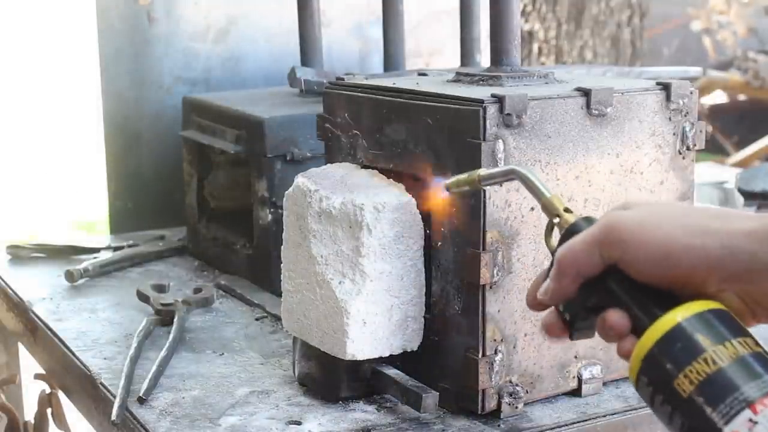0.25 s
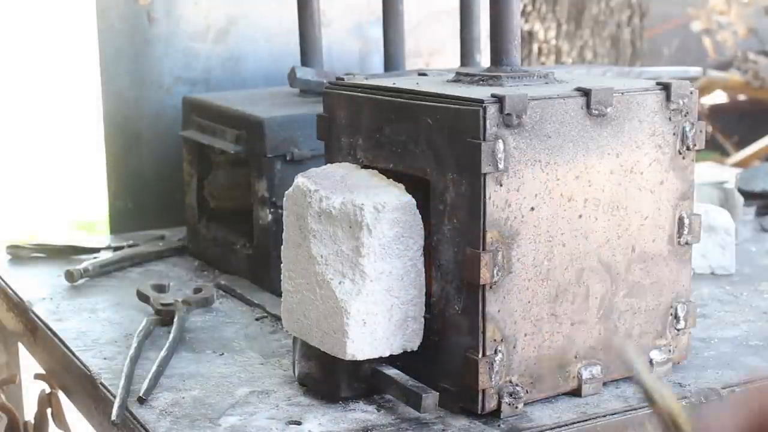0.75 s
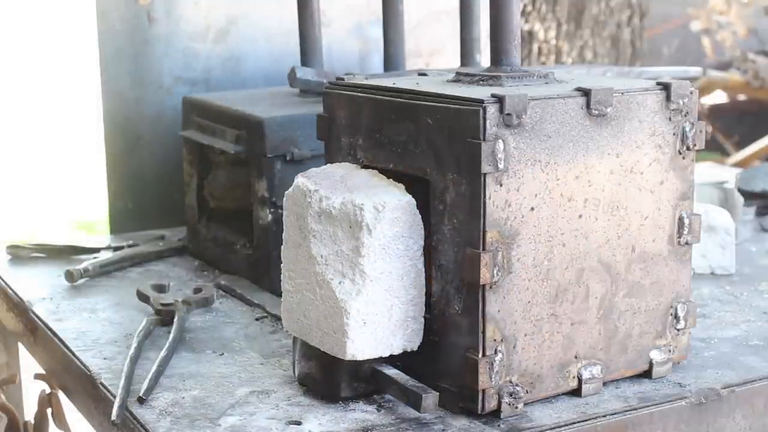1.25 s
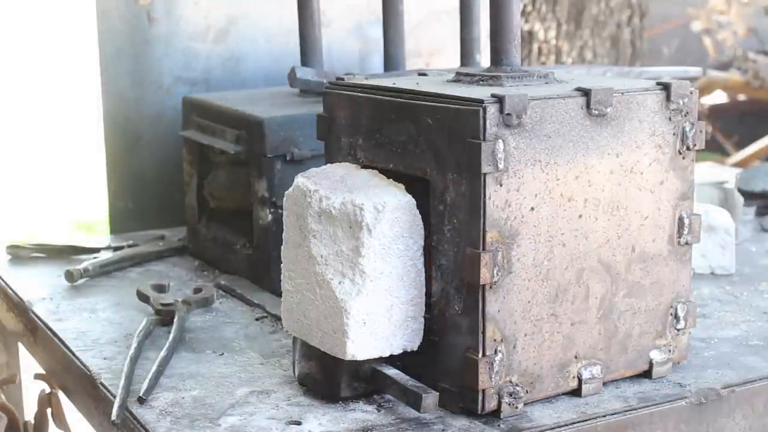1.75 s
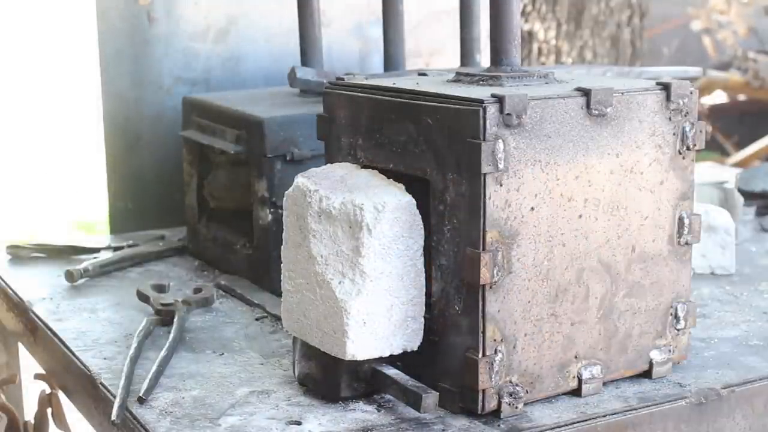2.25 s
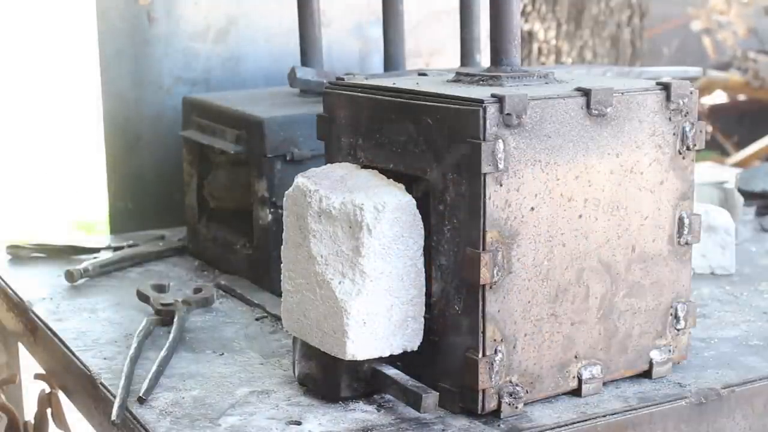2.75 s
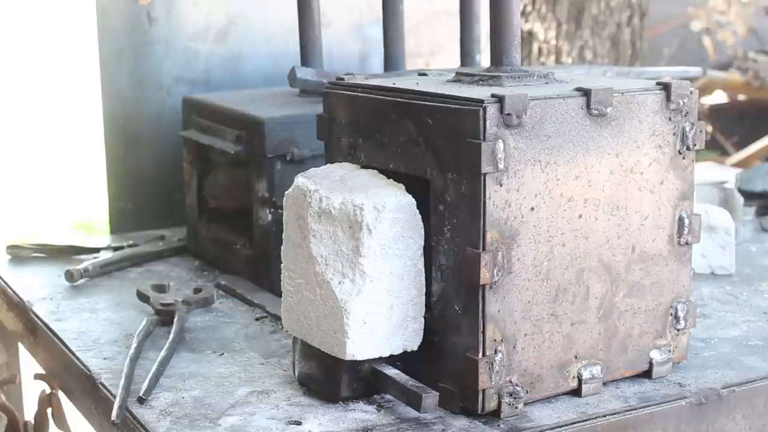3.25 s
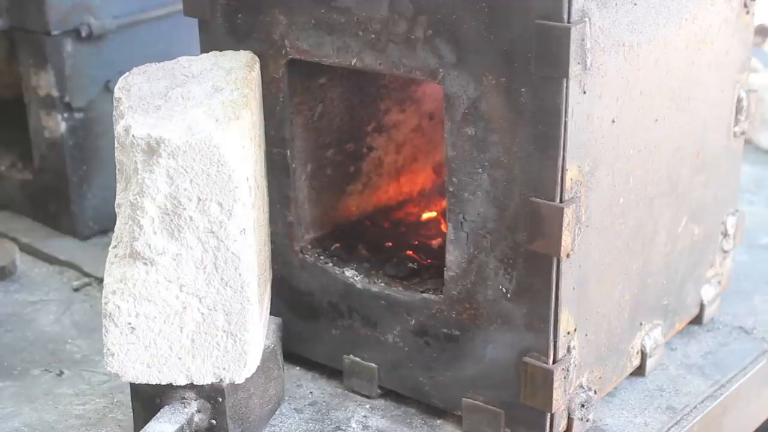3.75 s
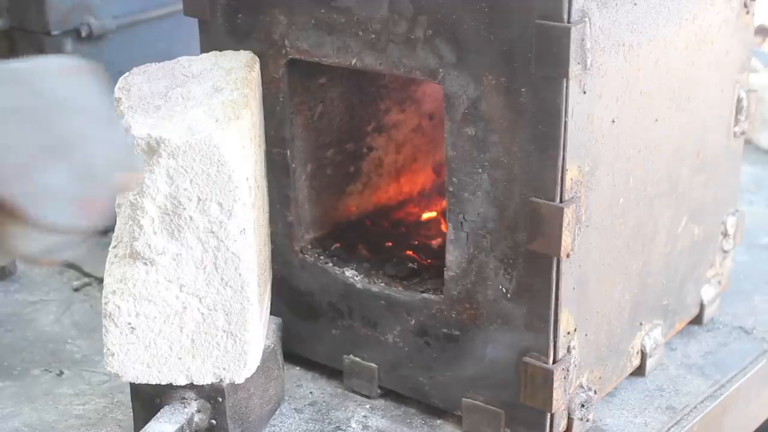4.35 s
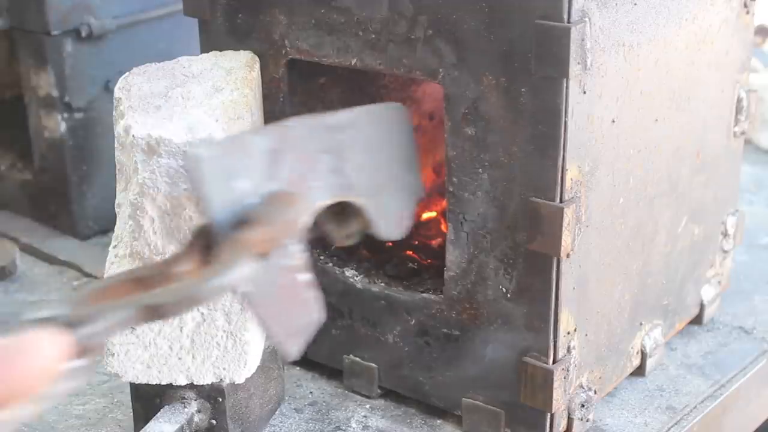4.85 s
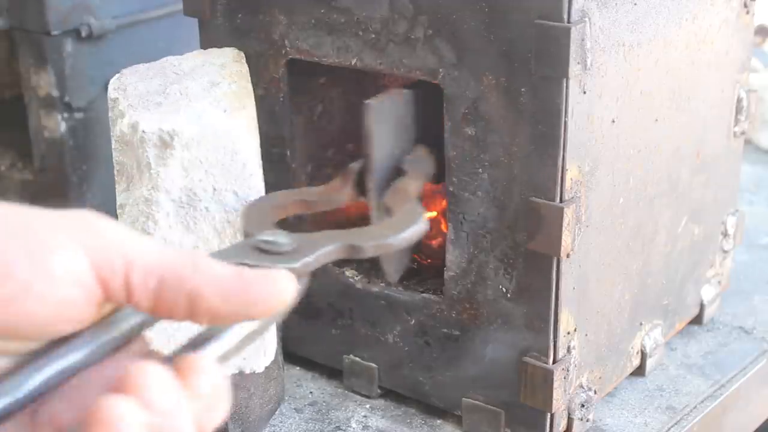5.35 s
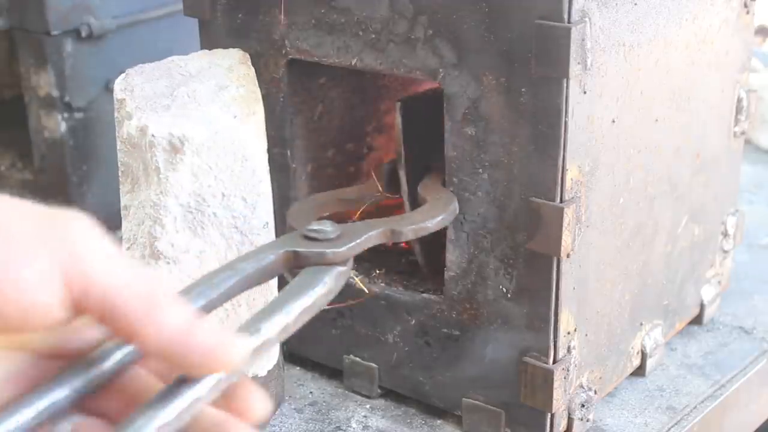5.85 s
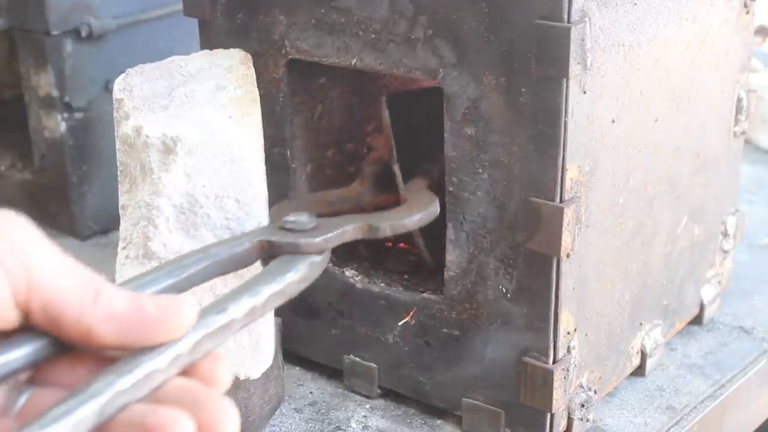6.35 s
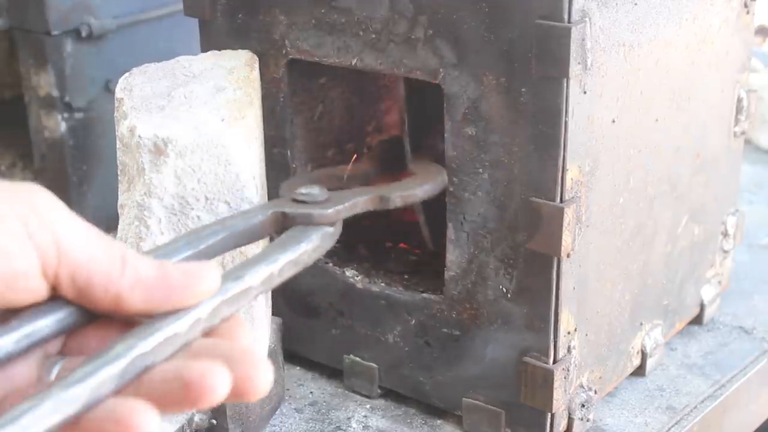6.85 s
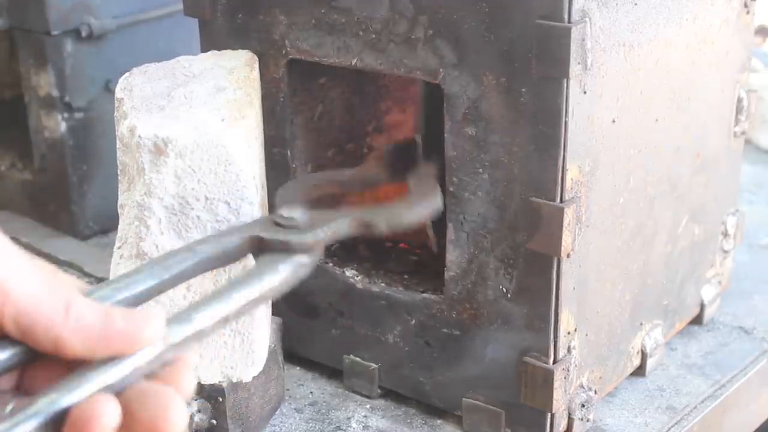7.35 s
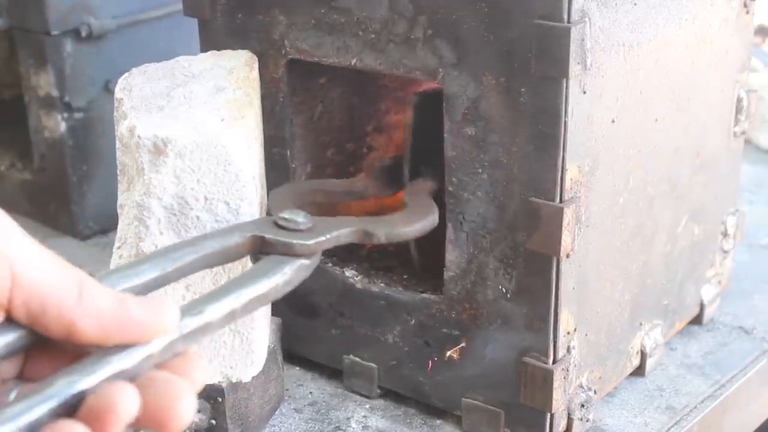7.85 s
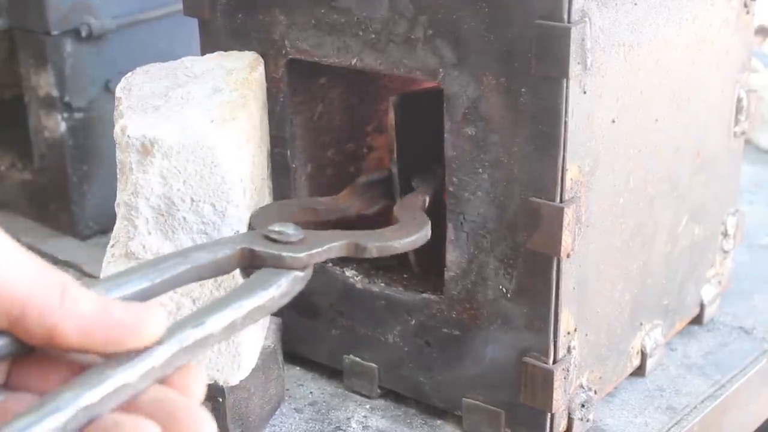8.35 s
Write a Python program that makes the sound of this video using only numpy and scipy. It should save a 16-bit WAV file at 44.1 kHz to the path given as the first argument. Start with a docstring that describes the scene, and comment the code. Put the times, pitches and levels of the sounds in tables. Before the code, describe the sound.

A hand torch hisses and pops, lighting a gas forge whose low roar fades, then returns closer as steel knocks and scrapes inside.

```python
"""A gas forge roars: random flame noise is shaped by fixed colours and by bands that glide in pitch.
A hand torch, a rough hiss with pops, lights it behind a half-closed mouth; the roar fades, then returns
at once, closer, with the mouth open. Tongs push in a steel plate, which dulls the roar. The plate knocks
(noise bursts and short rings) and scrapes (rough noise and snaps) on the lining; the tongs squeak
(rubbed modes). A short tail from close walls and a soft microphone hiss lie behind it all."""
import sys
import numpy as np
from scipy import signal
from scipy.fft import rfft, irfft, next_fast_len
from scipy.io import wavfile
from scipy.ndimage import uniform_filter1d

SR = 44100
rng = np.random.default_rng(int(sys.argv[2]) if len(sys.argv) > 2 else 0)


def store_wav(level_fs):
    """Save 16-bit WAV to argv[1]."""
    pcm = np.round(np.clip(np.atleast_2d(level_fs), -1, 1) * 32767)
    wavfile.write(sys.argv[1], SR, pcm.T.astype(np.int16))


N = 380141
T = np.arange(N) / SR  # time of each sample, s


def undb(db):
    """Turn decibels into a plain gain."""
    return 10 ** (np.asarray(db) / 20)


def unit(x):
    """Scale a signal to an average (RMS) strength of 1."""
    return x / np.sqrt(np.mean(x ** 2))


def colour(x, points, peaks=()):
    """Filter by a curve of (f/Hz, level/dB) and peaks of (f/Hz, width/Hz, level/dB); keeps white noise's power."""
    size = 8192
    hz = np.fft.rfftfreq(size, 1 / SR) + 1
    curve_hz, curve_db = np.array(points).T
    db = np.interp(np.log(hz), np.log(curve_hz), curve_db)
    for peak_hz, width_hz, peak_db in peaks:
        db = db + peak_db / (1 + (2 * (hz - peak_hz) / width_hz) ** 2)
    # fold the cepstrum forward so that the filter answers at once and never ahead of its input
    cepstrum = irfft(np.log(undb(db)))
    cepstrum[1:size // 2] *= 2
    cepstrum[size // 2 + 1:] = 0
    response = irfft(np.exp(rfft(cepstrum)))
    return signal.fftconvolve(x, response / np.linalg.norm(response))[:N]


def walk(rate):
    """Random levels, each held 1 / rate seconds, then smoothed twice; spread 1."""
    hold = int(SR / rate)
    levels = rng.standard_normal(N // 16 + 1)[:N // hold + 1]
    smooth = uniform_filter1d(np.repeat(levels, hold), hold)
    return unit(uniform_filter1d(smooth, hold)[:N])


def ring(x, hz, t60):
    """One mode struck by x: a tone that falls 60 dB in t60 seconds."""
    r = np.exp(-np.log(1000) / (t60 * SR))
    w = 2 * np.pi * hz / SR
    return signal.lfilter([0, np.sin(w)], [1, -2 * r * np.cos(w), r * r], x)


def bursts(times, dbs, t60s, rise_s=0.001):
    """Loudness curve of quick starts that die away."""
    out = np.zeros(N)
    for s, db, t60 in zip(times, dbs, t60s):
        i = int(s * SR)
        age = T[:min(SR // 4, N - i)]
        out[i:i + len(age)] += (1 - np.exp(-age / rise_s)) * undb(db - 60 * age / max(t60, .002))
    return out


# Colour of the roar for each state of the mouth: f/Hz, relative level/dB
BRICKED_COLOUR = [(15, -64), (25, -33), (82, -19), (140, -6.5), (315, -7), (360, -6.5), (498, -2.5),
                  (901, -27), (1590, -29), (1820, -36), (2580, -35), (3560, -39), (5480, -42.5),
                  (6440, -50), (15700, -55.5)]
OPEN_COLOUR = [(15, -68), (25, -40), (140, -3.5), (307, -4), (370, -1.5), (525, 0), (652, -5.5),
               (1240, -23), (1540, -19), (2510, -26.5), (3370, -25), (3860, -37), (4420, -38),
               (6800, -47.5), (15700, -52)]
ACROSS_COLOUR = [(15, -80), (25, -43), (64, -26), (129, -5.5), (298, -2.5), (391, -3), (447, -2),
                 (618, -8.5), (707, -25), (787, -14), (1420, -27.5), (1540, -31.5), (2510, -29.5),
                 (4070, -36.5), (15700, -56)]
PLATE_INSIDE_COLOUR = [(15, -72), (25, -49), (113, -7), (205, -4.5), (307, -1.5), (435, 2), (707, -16),
                       (787, -9.5), (1460, -28.5), (2020, -24.5), (3200, -33.5), (3660, -33.5),
                       (5190, -38.5), (5940, -45), (15700, -54.5)]
# Resonances and nulls of chamber and burner tubes:
# f/Hz, width/Hz, then level/dB bricked, level/dB open, level/dB plate across, level/dB plate inside
CHAMBER_MODES = [(301, 51, 8, 6, 3, 4), (381.5, 37, -1, -5.5, -2, -7), (461, 130, -1.5, 1, 4.5, 0),
                 (630, 160, -1, 4, 1.5, 2.5), (750, 83, 1, -3.5, 6, 1), (1327, 25, 9.5, 8, -13, 7),
                 (1536, 280, 5, -9.5, 3.5, 0.5), (1993, 140, 1, 4, 7, 7.5), (2146, 65, 8, 8, 7.5, 6.5),
                 (2417, 120, 3, 8, 10.5, 7.5), (2600, 144, 7, 7, 7.5, 1.5), (3187, 340, 4.5, 0, 3, 10.5),
                 (4380, 120, -1, 6.5, 3, 4.5), (5450, 690, 6.5, 9, 6.5, 6.5), (7100, 730, 4, 4.5, 0.5, 4.5),
                 (9100, 420, 6, 6, 1, 3.5)]
# Where the plate is: t/s, place (0 away, 1 across the mouth, 2 or more inside)
PLATE_PLACE = [(4.88, 0.05), (5.08, 0.97), (5.5, 0.89), (5.66, 0.98), (6.3, 2.5)]
# Two resonances of the open mouth shift and swell as the plate nears;
# once it is covered the low one dies, while the high one dips, then returns:
# t/s, low f/Hz, low level/dB, high f/Hz, high level/dB
MOUTH_BANDS = [(3.68, 634, -35.5, 2490, -54), (4.3, 638, -38, 2430, -58.5), (4.65, 696, -34.5, 2420, -45),
               (4.87, 785, -30, 2500, -38), (4.95, 796, -46, 2500, -62), (5.2, 800, -60, 2440, -44),
               (5.5, 800, -76, 2620, -51)]
# Two resonances behind the brick drift and swell while the flame settles:
# t/s, low f/Hz, low level/dB, high f/Hz, high level/dB
SETTLING_BANDS = [(.35, 312, -34, 471, -24.5), (1.1, 300, -34, 418, -36.5), (1.6, 221, -27.5, 510, -32),
                  (2.0, 202, -39.5, 440, -35.5), (2.5, 197, -45, 559, -32), (3.3, 189, -45, 523, -30)]
# Gas in the chamber mouth whooshes up before it catches: t/s, f/Hz, level/dB
WHOOSH_BAND = [(.17, 1500, -42), (.27, 1500, -41), (.3, 1450, -24), (.34, 1000, -35), (.4, 1100, -68)]
MOUTH_WIDTH_HZ, SETTLING_WIDTH_HZ, WHOOSH_WIDTH_HZ = (100, 400), (60, 70), (1160,)
CATCH_S, CATCH_RISE_S = 0.286, 0.034  # the forge lights
BRICKED_DB, OPEN_DB = -25, -24  # level of the coloured roar, without the gliding bands


def forge():
    """Flame noise heard through the chamber, whose resonances change as brick or plate covers the mouth."""
    drive = turbulence()
    modes = np.array(CHAMBER_MODES)
    colours = BRICKED_COLOUR, OPEN_COLOUR, ACROSS_COLOUR, PLATE_INSIDE_COLOUR
    bricked, *states = (colour(drive, c, modes[:, [0, 1, 2 + k]]) for k, c in enumerate(colours))

    # far view: the flame catches behind the brick
    lit = np.clip((T - CATCH_S) / CATCH_RISE_S, 0, 1) ** 2
    air = np.roll(drive, SR)  # the same noise a second apart, so these bands vary on their own
    settling = glide(air, SETTLING_BANDS, SETTLING_WIDTH_HZ)
    whoosh = glide(air, WHOOSH_BAND, WHOOSH_WIDTH_HZ)
    far = lit * (undb(BRICKED_DB) * bricked + settling) + whoosh

    # close view: the plate's place cross-fades the three colours
    place = np.clip(np.interp(T, *np.transpose(PLATE_PLACE)), 0, 2)
    roar = sum(np.clip(1 - np.abs(place - k), 0, 1) * state for k, state in enumerate(states))
    near = undb(OPEN_DB) * roar + glide(drive, MOUTH_BANDS, MOUTH_WIDTH_HZ)
    return far, near


def turbulence(puff_db=2.1, puff_rate=300, swell_db=.4, flicker_db=.9, wander_db=.8, sputter_db=1.2):
    """Uneven burning: quick puffs in all bands, sputter in the gas jets, each half octave flickering alone."""
    puffs = walk(puff_rate)
    # a puff uses up gas, so a lull follows it and the mean over 50 ms stays even
    puffs = puff_db * unit(puffs - uniform_filter1d(puffs, SR // 20))
    puffs = puffs + swell_db * walk(2.594)
    sputter = walk(22)
    sputter = sputter_db * unit(sputter - uniform_filter1d(sputter, SR // 3))

    size = next_fast_len(N)
    spectrum = rfft(rng.standard_normal(N), size)
    half_octave = 2 * np.log2(np.fft.rfftfreq(size, 1 / SR) / 40 + 1e-9)  # counted up from 40 Hz
    half_octave = np.clip(half_octave, 0, 18)
    out = 0
    for k in range(19):
        share = np.cos(np.pi / 2 * np.clip(half_octave - k, -1, 1)) ** 2  # overlapping bands
        jet = np.clip((k - 7) / 6, 0, 1)  # higher bands belong more to the gas jets
        flicker = flicker_db * walk(12)
        wander = (1 - 0.59 * jet) * wander_db * walk(2.403)
        level_db = (1 - 0.58 * jet) * puffs + jet * sputter + flicker + wander
        out = out + irfft(spectrum * share)[:N] * undb(level_db)
    return unit(out)


def glide(drive, table, widths_hz):
    """Resonances as narrow bands of flame noise, whose pitches and levels glide along a table."""
    s, *columns = np.transpose(table)
    span = slice(int(s[0] * SR) - SR // 10, int(s[-1] * SR) + SR // 2)
    t, out = T[span], np.zeros(N)
    for hz, db, width_hz in zip(columns[::2], columns[1::2], widths_hz):
        # shift the band down to 0 Hz, keep what is near it, shift it back up
        turn = np.exp(2j * np.pi * np.cumsum(np.interp(t, s, hz)) / SR)
        lowpass = signal.butter(2, width_hz / 2, fs=SR, output="sos")
        band = signal.sosfilt(lowpass, drive[span] / turn) * turn
        out[span] += unit(band.real) * undb(np.interp(t, s, db)) * (t > s[0])
    return out


# Torch jet sputters out, relights with a burst, holds nearly steady while the forge catches, then is shut:
# t/s, level/dB
TORCH_JET = [(0, -27.5), (.11, -42), (.124, -39), (.13, -25.5), (.18, -29.5), (.275, -28.5), (.3, -29),
             (.34, -29), (.36, -33), (.4, -36.5), (.5, -65)]
# Colour of the torch jet: f/Hz, relative level/dB
TORCH_COLOUR = [(35, -69), (60, -31), (361, -13.5), (396, -12.5), (455, -13.5), (561, -11.5), (602, -22),
                (708, -15), (1240, -11.5), (15700, -46.5)]
# Ignition pops: t/s, level/dB (of the start, before its rise), time to fall 60 dB/s
IGNITION_POPS = [(0.133, -27.5, 0.078), (0.1443, -9, 0.029)]
# Colour of the pops: f/Hz, relative level/dB
POP_COLOUR = [(59, -19), (100, -12), (468, 5), (2600, -25), (3080, -29), (3800, -4), (4600, -22),
              (5930, -13.5), (15700, -36.5)]
VALVE_S, VALVE_DB = .3605, -36  # torch trigger clicks shut


def torch():
    """Gas rushing from a nozzle as rough noise, pops of gas catching, and the click of the trigger."""
    rough_noise = unit(rng.standard_normal(N) * undb(1.0 * walk(213.0)))
    gas = undb(np.interp(T, *np.transpose(TORCH_JET), right=-200))  # silent after the last row
    jet = colour(rough_noise, TORCH_COLOUR) * gas
    pops = colour(rng.standard_normal(N) * bursts(*np.transpose(IGNITION_POPS)), POP_COLOUR)
    bright_noise = np.diff(rng.standard_normal(N + 1))
    click = bright_noise * bursts([VALVE_S], [VALVE_DB], [.012])
    return jet + pops + click


# Plate knocking on the lining: t/s, relative level/dB, brightness as level/dB, spot (0 face to 1 edge)
PLATE_KNOCKS = [(4.5676, -24.5, -8, .2), (5.6075, -27, -1, .05), (5.7184, -26, -9, .05),
                (5.7394, -30, -6, .05), (5.753, -29, -9, .3), (5.798, -19, 4.5, .3), (5.813, -32, 3, .1),
                (6.1994, -28, 5, .4), (6.2494, -32, 9, .4), (6.4014, -27.5, -1, .4), (6.4178, -29, -6, .7),
                (6.4564, -26.5, 5, .4), (6.505, -37, 8, .4), (6.7231, -30, 7, .4), (6.821, -25, -2, .4),
                (6.8314, -34, 10, .4), (6.984, -30, 3, .7), (7.109, -36, 0, .4), (7.1294, -30, 2, 0.62),
                (7.496, -16, 2, .1), (7.512, -36, 3, .2), (7.638, -25, 3, .3), (7.647, -31, 1, .6),
                (7.671, -23, 0, .3), (7.681, -24.5, 7, .2), (7.7543, -26, 7, .7), (7.848, -25, -1, .5),
                (7.872, -28, 4, .3), (7.9624, -24, -2, .5), (7.991, -20.5, 2, .9)]
# Colour of knocks and scrapes: f/Hz, relative level/dB
KNOCK_COLOUR = [(300, -18), (900, 5.5), (1400, 3.5), (2200, 0), (3300, 0), (5200, -7), (6500, -12),
                (10000, -20), (15800, -22)]
# Modes of the plate: f/Hz, level/dB hit on the face, level/dB hit on the edge, time to fall 60 dB/s
PLATE_MODES = [(1500, 12, -13, 0.023), (2130, 1, 0, 0.036), (3420, 1, -2, 0.03), (4200, -9, -3, 0.04),
               (5190, -10, 1, 0.045), (7300, -11, -1, .03)]
# Plate dragged over the rough lining: start t/s, length/s, relative level/dB
PLATE_DRAGS = [(4.523, 0.081, -48), (5.565, 0.055, -47), (5.695, 0.071, -40.5), (6.115, 0.13, -46),
               (6.3, 0.17, -48), (6.602, 0.21, -44.5), (6.967, 0.14, -50), (7.2, 0.28, -55),
               (7.62, 0.089, -48), (7.78, 0.18, -46.5)]
KNOCK_T60_S, KNOCK_CRUNCH_S = 0.045, 0.0069  # decay of a blow; time the lining crunches under it
DRAG_SWELL, DRAG_STOP_S = 0.5, 0.03  # power of the build-up; time to die away
# crumbs snapping under the drag: how many, level relative to the drag, its scatter, decay
GRIT_PER_S, GRIT_DB, GRIT_SCATTER_DB, GRIT_T60_S = 200, 6, 3.5, 0.008


def plate(crack_db=-1, ring_db=-40, vary_db=4.0, rise_s=0.0022, treble_db=-3, chime_db=-20,
          chime_t60=0.016, grit_db=4, scrape_hz=3500, tick_db=14):
    """Blows make gritty cracks that ring the steel, each with its own brightness; drags rasp and snap crumbs."""
    s, db, bright_db, on_edge = np.transpose(PLATE_KNOCKS)
    on_edge = np.clip(on_edge, 0, 1)
    dull_noise, sharp_noise, drag_noise = rng.standard_normal((3, N))

    drag = np.zeros(N)
    for start, length, drag_db in PLATE_DRAGS:
        swell = np.clip((T - start) / length, 0, 1) ** DRAG_SWELL
        stop = np.exp(-np.clip(T - start - length, 0, None) / DRAG_STOP_S)
        drag += undb(drag_db) * swell * stop

    # crumbs snap at random moments, as strongly as the drag allows
    snap_now = rng.random(N) < GRIT_PER_S / SR
    snaps = snap_now * undb(GRIT_DB + GRIT_SCATTER_DB * rng.standard_normal(N)) * drag
    crumb_decay = undb(-60 / (GRIT_T60_S * SR))
    crumbs = signal.lfilter([1], [1, -crumb_decay], uniform_filter1d(snaps, SR // 500))

    def crunch(level_db):
        """Loudness of the blows, smeared over the crunch time."""
        blows = bursts(s, level_db, np.full(len(s), KNOCK_T60_S), rise_s)
        return uniform_filter1d(blows, int(KNOCK_CRUNCH_S * SR))

    # below 6 kHz follows the level; above it also follows the brightness
    below = signal.butter(2, 6000, fs=SR, output="sos")
    above = signal.butter(2, 6000, "high", fs=SR, output="sos")
    dull = signal.sosfilt(below, crunch(db) * dull_noise)
    sharp = signal.sosfilt(above, crunch(db + bright_db + treble_db) * sharp_noise)
    contact = dull + sharp

    latest = np.clip(np.searchsorted(s, T) - 1, 0, None)  # the most recent knock at each moment
    spot_db = vary_db * rng.standard_normal((len(PLATE_MODES), len(s)))  # each blow lands on its own spot
    rings = 0
    for (hz, face_db, edge_db, t60), spot in zip(PLATE_MODES, spot_db):
        mode_db = face_db + on_edge * (edge_db - face_db) + spot
        rings = rings + ring(contact * undb(mode_db)[latest], hz, t60)

    rasp = (drag + crumbs) * unit(drag_noise * undb(grit_db * walk(120)))
    rasp = signal.lfilter(*signal.butter(1, scrape_hz, fs=SR), rasp)  # dull rasp
    scrape = rasp + undb(tick_db) * snaps  # thin ticks
    # crumbs ping the tongs
    chimes = sum(ring(snaps * rng.standard_normal(N), hz, chime_t60) for hz, *_ in TONGS_MODES)
    knocks = colour(undb(crack_db) * contact + scrape, KNOCK_COLOUR)
    return undb(chime_db) * chimes + knocks + undb(ring_db) * rings


# Tongs squeaking: t/s, length/s, relative level/dB, spot (0 jaw to 1 pivot)
TONGS_SQUEAKS = [(6.43, 0.025, -56, 0.085), (6.455, 0.026, -48, 0), (6.66, 0.06, -50, 0.28),
                 (6.715, 0.017, -48, 0.25), (7.02, 0.08, -62, 0.84), (7.11, .025, -62, 1),
                 (7.905, 0.03, -60, 0.76)]
# Modes of the tongs: f/Hz, level/dB rubbed at the jaw, level/dB rubbed at the pivot
TONGS_MODES = [(4790, 5.5, -30), (6470, -20, 8), (7100, -6, -12), (7500, -20, 6), (8100, -16, -15),
               (9950, -10, 0), (11580, 3, -13), (12300, -25, -7), (13400, -17, -18), (14500, -18, -14),
               (14800, -20, -6)]


def tongs(mode_t60=0.025, rough=1.3, flutter_db=5.0, flutter_s=0.015):
    """Rubbing steel drives its modes with a rough swell; jaw and pivot favour different ones."""
    out, age = np.zeros(N), T[:SR // 5]
    for s, length, db, pivot in TONGS_SQUEAKS:
        start = int(s * SR)
        swell = np.sin(np.pi * np.clip(age / length, 0, 1))
        for hz, jaw_db, pivot_db in TONGS_MODES:
            roughness = 1 + rough * rng.standard_normal(len(age))
            rub = swell * roughness * np.sin(2 * np.pi * hz * age)
            flutter = uniform_filter1d(rng.standard_normal(len(age)), int(flutter_s * SR))
            tone = ring(rub * undb(flutter_db * unit(flutter)), hz, mode_t60)
            gain = undb(db + jaw_db + np.clip(pivot, 0, 1) * (pivot_db - jaw_db))
            out[start:start + len(age)] += gain * np.sqrt(2) * tone / np.abs(tone).max()
    return out


SHED_T60_S, SHED_DB = .1, -13  # decay of the tail; its level relative to the direct sound


def shed(x):
    """Close walls and bench add a short dense tail, which ripples the spectrum."""
    age = T[:SR // 4]
    tail = rng.standard_normal(len(age)) * undb(-60 * age / SHED_T60_S)
    tail = tail * (age > .003)  # the first reflections arrive after 3 ms
    wet = undb(SHED_DB)
    echo = signal.fftconvolve(x, tail / np.linalg.norm(tail))[:N]
    return (x + wet * echo) / np.sqrt(1 + wet ** 2)


FADE_START_S, FADE_END_S = 2.16, 3.686  # straight fade of the gain
CLOSE_S, CLOSE_RISE_S = 3.679, 0.0032  # the close view starts
HISS_DB = -67  # microphone hiss


def scene():
    """The lighting is faded out; the close view starts abruptly. Both carry the same microphone hiss."""
    far, near = forge()
    fade = np.clip((FADE_END_S - T) / (FADE_END_S - FADE_START_S), 0, 1)
    start = np.clip((T - CLOSE_S) / CLOSE_RISE_S, 0, 1)
    hiss = undb(HISS_DB) * rng.standard_normal(N)
    lighting = shed(far + torch()) + hiss
    close_view = shed(near + plate() + tongs()) + hiss
    return (fade * lighting + start * close_view)[None]


TOP_HZ = 15830


def record(dry):
    """The recorder steeply cuts everything above its top frequency."""
    return signal.sosfiltfilt(signal.ellip(12, .1, 50, TOP_HZ, fs=SR, output="sos"), dry)


dry = scene()
out = record(dry)
store_wav(out)
```